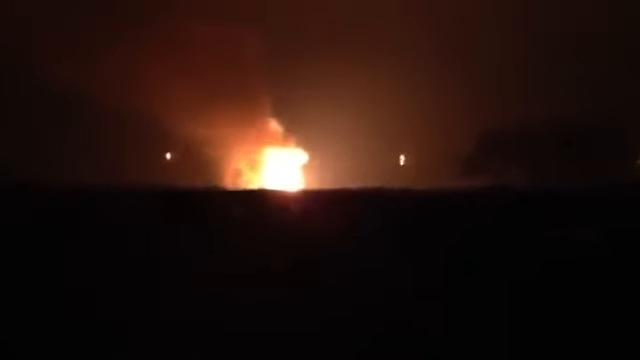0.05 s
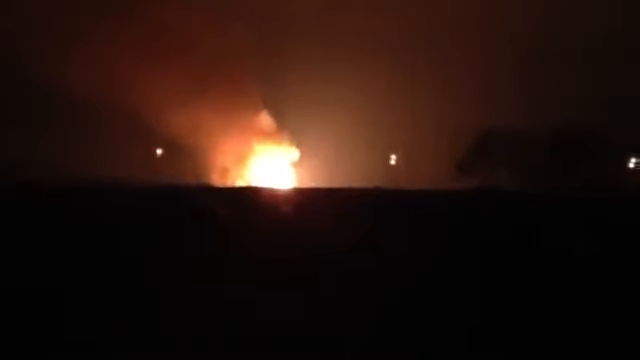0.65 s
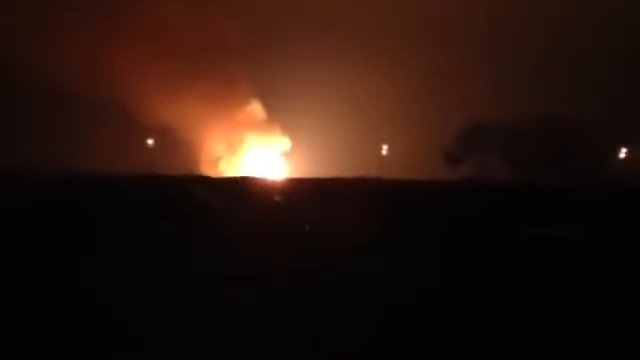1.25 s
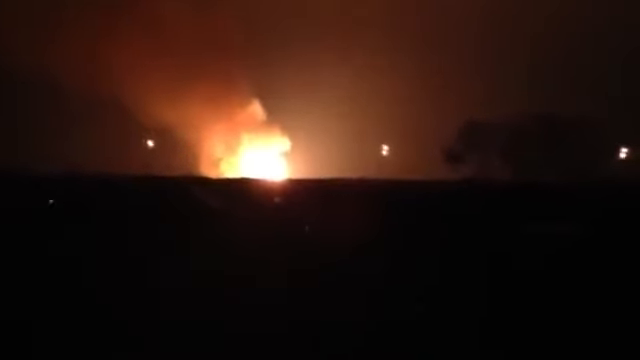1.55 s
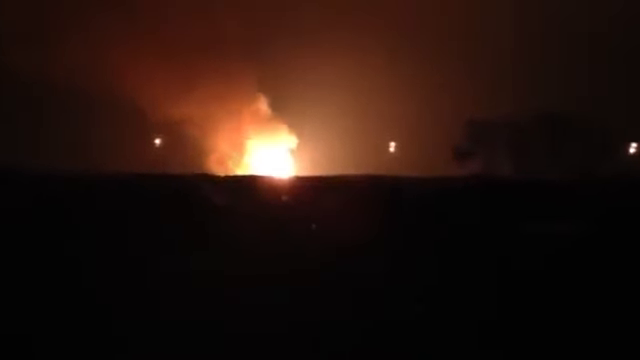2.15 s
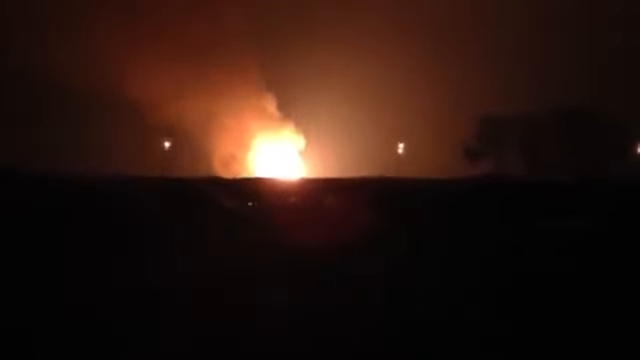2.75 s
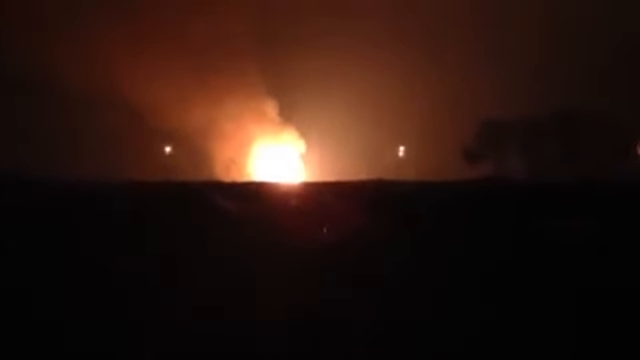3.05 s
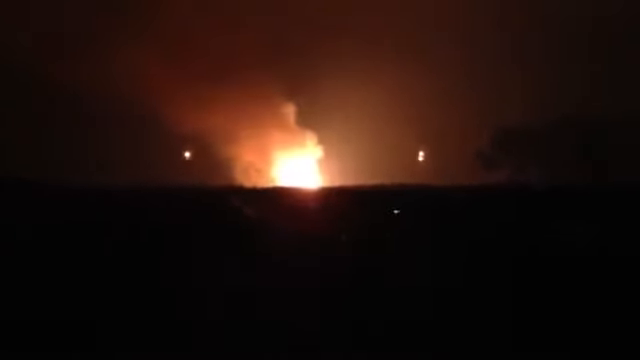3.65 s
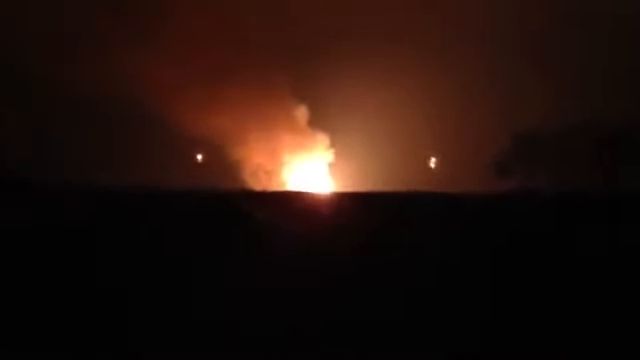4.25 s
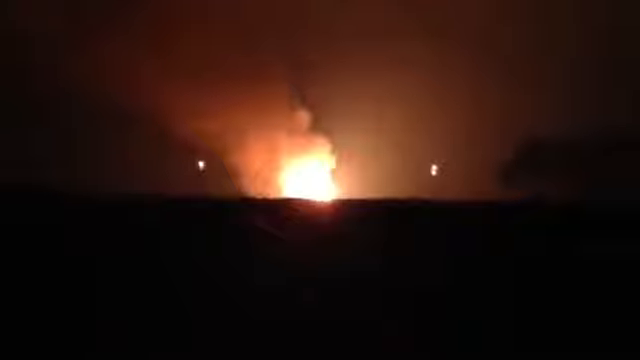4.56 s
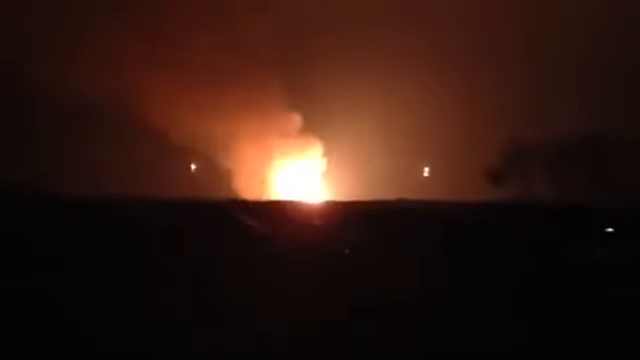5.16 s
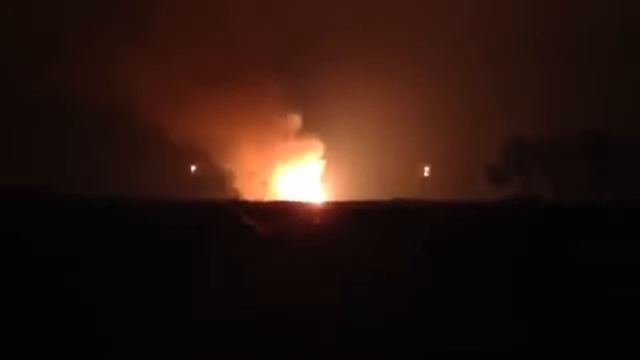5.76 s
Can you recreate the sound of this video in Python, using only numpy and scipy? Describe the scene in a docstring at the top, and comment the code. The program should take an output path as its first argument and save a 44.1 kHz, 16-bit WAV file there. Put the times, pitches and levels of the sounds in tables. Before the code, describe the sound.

A large gas fire roars far across a field at night, heard on a phone at an open window. The sound is deep, muffled and continuous, billowing as fireballs roll off the flame. A hollow blowing tone rides on it at the start and returns in a few surges past the middle. A faint hiss, soft dry ticks and slight hand rustles lie on top.

```python
"""Distant gas fire at night

A large gas fire roars far across a field, heard on a phone at an open window. The swirling flame makes
a deep, billowing noise with a few hollow surges. The air takes its treble and fades its pitch bands in
and out; the window recess colours it. A faint hiss, a hand's rustle and a few dry ticks lie on top."""
import sys
import numpy as np
from scipy import signal
from scipy.fft import rfft, irfft
from scipy.io import wavfile
from scipy.ndimage import uniform_filter1d, map_coordinates

SR = 44100
rng = np.random.default_rng(int(sys.argv[2]) if len(sys.argv) > 2 else 0)


def transcribe(u):
    """Save the signal u as a 16-bit wav file named by the first command-line argument.

    u: samples, shape (n,) or (channels, n), limited to [-1, 1]; the rate is SR.
    q: integer samples, one column per channel.
    """
    v = np.clip(np.atleast_2d(u).T, -1, 1)
    q = np.round(v * 32767).astype(np.int16)
    wavfile.write(sys.argv[1], SR, q)


N = 259749


def undb(db):
    """Turn decibels into a gain, the number to multiply a sound by."""
    return 10 ** (np.asarray(db) / 20)


def curve(points):
    """Join (time [s], value) points with straight lines, giving one value per sample."""
    times, values = np.transpose(points)
    return np.interp(np.arange(N) / SR, times, values)


def freqs():
    """The frequency of each slot of the spectrum, in Hz."""
    return np.maximum(np.arange(N // 2 + 1) * SR / N, 1)


def colour(points):
    """Join (frequency [Hz], level [dB]) points into a gain for each frequency."""
    hz, db = np.transpose(points)
    return undb(np.interp(np.log(freqs()), np.log(hz), db))


def peak(hz, width_hz):
    """The shape of a resonance: 1 at hz, falling away on both sides."""
    return 1 / (1 + (2 * (freqs() - hz) / width_hz) ** 2)


def bump(x, centre, half_width):
    """A smooth bell shape, 1 at its centre."""
    return np.exp(-((x - centre) / half_width) ** 2)


def noise(gain):
    """Noise shaped by a gain for each frequency, then brought to an average strength of 1."""
    x = irfft(rfft(rng.standard_normal(N)) * gain, N)
    return x / np.std(x)


def steady(x, span_s):
    """Even out a noise's level over spans longer than span_s; its quick flutter stays."""
    size = max(int(span_s * SR), 2)
    power = uniform_filter1d(uniform_filter1d(x ** 2, size), size)
    return x / np.sqrt(power)


def wobble(rate_hz):
    """A smooth random curve of typical size 1 that changes about rate_hz times a second."""
    return noise(1 / (1 + (freqs() / rate_hz) ** 4))


def background(level_db=-57):
    """A steady low murmur and the microphone's own thin noise."""
    # tone of the background: (frequency [Hz], relative level [dB])
    tone = [(15, -2), (30, -1), (55, 1.5), (90, 3), (400, -23.5), (3000, -36), (7500, -38), (9700, -48),
            (11500, -44), (14500, -40)]
    return noise(colour(tone)) * undb(level_db)


def hiss(flicker_db=1.0, flicker_hz=40, focus_steepness=2.5):
    """The little treble that arrives from so far: a faint, flickering hiss that sharpens as it swells."""
    # loudness of the broad hiss: (time [s], level [dB])
    levels = [(0, -65.5), (.4, -68), (.75, -64), (1.05, -61), (1.35, -62.5), (1.6, -59.7), (1.85, -58.3),
              (2.15, -60), (2.5, -62), (3.0, -63), (3.7, -61.5), (4.0, -60.5), (4.22, -57.5), (4.6, -59.5),
              (5.1, -61.3), (5.89, -60)]
    # tone of the broad hiss: (frequency [Hz], relative level [dB])
    tone = [(1200, -13), (2250, 8), (2600, 4), (3100, 1), (3900, -3), (4400, -3.5), (5200, -10.5),
            (7300, -13.5), (9500, -28.5), (14000, -22)]
    # the band where the hiss gathers: (centre [Hz], width [Hz], level at its loudest [dB])
    focus_band = (3900, 820, -65.5)
    hz, width, crest_db = focus_band
    hiss_db = curve(levels)
    focus_db = crest_db + focus_steepness * (hiss_db - hiss_db.max())
    broad = noise(colour(tone)) * undb(hiss_db)
    focus = noise(peak(hz, width)) * undb(focus_db)
    return (broad + focus) * undb(flicker_db * wobble(flicker_hz))


def rustles(grain_db=1.3, grain_hz=200, attack_s=0.0028):
    """Skin slips on the phone's case in short, slightly grainy strokes that trail away."""
    # slips of the hand: (start [s], fade time [s], level [dB])
    strokes = [(0.01, 0.069, -64.5), (0.128, .025, -68), (0.935, 0.047, -64), (4.882, 0.033, -54.5),
               (4.916, 0.037, -57), (4.944, .15, -65.5), (5.315, 0.039, -63), (5.669, 0.033, -61),
               (5.73, 0.04, -63.5), (5.86, 0.059, -57)]
    # tone of the rubbing: (frequency [Hz], relative level [dB])
    tone = [(1200, -9.5), (3500, 1.5), (5500, -4), (8300, -5.5), (10000, -14.5), (15000, -13)]
    t = np.arange(N) / SR
    pressure = 0
    for start, fade_s, db in strokes:
        age = np.maximum(t - start, 0)
        pressure += undb(db) * np.minimum(age / attack_s, 1) * np.exp(-age / fade_s)
    return pressure * noise(colour(tone)) * undb(grain_db * wobble(grain_hz))


def ticks():
    """Soft, dry ticks; the double one at 3.15 s is the phone crackling on a loud billow."""
    # ticks, the narrow ones slightly pitched:
    # (start [s], level [dB], fade time [s], centre [Hz], half-width [octaves])
    dry_ticks = [(2.259, -59, .012, 4320, .035), (2.281, -60, .013, 3440, .04),
                 (2.7601, -64, 0.0041, 3400, .4), (3.1511, -46, 0.0011, 3180, 0.46),
                 (3.1529, -54, 0.00092, 4570, .55), (4.879, -54, .003, 5030, .65),
                 (5.4835, -62, 0.006, 6500, .35)]
    t = np.arange(N) / SR
    out = 0
    for start, db, fade_s, hz, octaves in dry_ticks:
        band = 1 / (1 + (np.log2(freqs() / hz) / octaves) ** 2)
        fade = (t >= start) * np.exp(-np.maximum(t - start, 0) / fade_s)
        burst = rng.standard_normal(N) * fade
        tick = irfft(rfft(burst) * band, N)
        out += undb(db) * tick / np.sqrt(np.mean(band ** 2))  # make up for what the filter took
    return out


def window_recess():
    """Reflections in the window opening lift some pitches and cancel others; a gain for each frequency."""
    # peaks and dips of the recess: (centre [Hz], width [Hz], boost or cut [dB])
    resonances = [(135, 4.7, -3), (149.4, 19, 4), (206, 32, -3), (210, 4.1, 3), (288, 16, -3.5),
                  (302, 23, 2.5), (393.7, 23, -4.5), (404, 140, 1.5), (487, 17, -1.5), (535, 69, 4),
                  (640, 36, 3), (660, 20, -1), (813, 100, 3.5), (815, 33, -5.5), (882, 15, 3.5),
                  (1040, 19, -5.5), (1070, 58, 4.5), (1180, 47, 3), (1420, 40, 1), (1700, 120, 0.5)]
    return undb(sum(db * peak(hz, width) for hz, width, db in resonances))


def thin_bass(x, cutoff_hz=84):
    """The small microphone hardly takes in the deepest part of the roar."""
    return signal.sosfilt(signal.butter(6, cutoff_hz, "high", fs=SR, output="sos"), x)


def surges(attack_s=0.018, release_s=0.06, wander=0.01486, wander_hz=3, even_s=0.04):
    """Bursts of stronger gas flow blow a hollow note whose pitch wanders a little."""
    # bursts of the gas jet: (start [s], length [s], level [dB])
    bursts = [(0, 0.46, -28.5), (4.112, .43, -26), (4.642, 0.12, -23.5), (4.85, 0.45, -28)]
    # broad resonances of the note: (centre [Hz], width [Hz], relative level [dB])
    resonances = [(444, 64, -1), (547, 39, -3)]
    t = np.arange(N) / SR
    flow = 0
    for start, length, db in bursts:
        rise = np.clip((t - start) / attack_s, 0, 1)
        fall = np.exp(-np.maximum(t - start - length, 0) / release_s)
        flow = np.maximum(flow, undb(db) * rise * fall)
    note = noise(sum(undb(db) * peak(hz, width) for hz, width, db in resonances))
    speed = 1 + wander * wobble(wander_hz)  # playing faster or slower bends the pitch
    note = map_coordinates(note, [np.cumsum(speed)], mode="mirror")
    return flow * steady(note, even_s)


def lulls(hz, rumble_hz=160, reach_octaves=1.1):
    """The burning drops briefly between fireballs, most in the rumble; dB change for the band at hz."""
    # drops in the burning: (time [s], half-width [s], change in the rumble [dB])
    drops = [(.07, 0.13, -5.5), (.92, 0.028, -3), (1.78, 0.059, -1.5), (2.42, 0.043, -0.5),
             (4.05, 0.09, -4), (4.49, .04, -2.5), (5.06, 0.058, -4)]
    t = np.arange(N) / SR
    reach = bump(np.log2(hz / rumble_hz), 0, reach_octaves)
    return reach * sum(db * bump(t, at, half_width) for at, half_width, db in drops)


def billows(hz, half_width_s=0.046, reach_octaves=0.83, dip_gap_s=0.06, dip_share=0.32):
    """Fireballs roll off the flame: each swells between two dips; dB change for the band at hz."""
    # the strongest billows, each swelling around its own pitch: (time [s], swell size [dB], pitch [Hz])
    swells = [(.28, 3.5, 368), (.512, 4, 174), (0.799, 2.5, 131), (.92, 2.5, 507), (1.14, 2.5, 1100),
              (1.684, 5.5, 208), (1.956, 2, 141), (2.165, 3, 228), (2.256, 4, 137.4), (2.471, 2.5, 290),
              (2.606, 3.5, 131), (2.707, 4, 186), (3.155, 5.5, 180), (3.315, 4, 148), (3.616, 4.5, 140),
              (3.866, 4.5, 139), (3.915, 6, 219), (4.155, 5, 309), (4.255, 5.5, 220), (4.377, 5, 170),
              (4.585, 4.5, 240), (4.722, 5.5, 168), (4.79, 5, 135), (4.845, 5, 283), (5.214, 2, 161)]
    t = np.arange(N) / SR
    change_db = 0
    for at, db, pitch in swells:
        reach = bump(np.log2(hz / pitch), 0, reach_octaves)
        swell = bump(t, at, half_width_s)
        dips = bump(t, at - dip_gap_s, half_width_s) + bump(t, at + dip_gap_s, half_width_s)
        change_db += db * reach * (swell - dip_share * dips)
    return change_db


def flame(level_db=-19.0, flutter_db=0.57, flutter_hz=25, fade_hz=6, even_s=0.076):
    """Big swirls of burning gas rumble and billow, small ones rush more evenly; all flutter together."""
    # tone of the distant flame, shaping each band: (frequency [Hz], relative level [dB])
    tone = [(50, -30), (70, -30), (90, -17.5), (112, -6.5), (160, -0.5), (240, -1.5), (330, -4.5),
            (540, -13.5), (700, -19), (1100, -25), (1650, -34), (2050, -48), (3000, -82.5)]
    # strength of the burning, which builds slowly and sinks at the end: (time [s], relative level [dB])
    blaze = [(0, -20.5), (.5, -22), (1.4, -19.5), (2.3, -20), (2.75, -19), (3.1, -17), (3.5, -20),
             (4.05, -18), (4.8, -19), (5.05, -18), (5.3, -20), (5.89, -24.5)]
    # pitch bands, lowest first: (centre [Hz], relative level [dB], share of the blaze, random fade [dB])
    bands = [(142, -1.66, 1.1, 0.5), (211, -4.5, .35, 1.25), (315, -4.5, 0.15, 0), (520, -8, 0.16, 1.0),
             (1100, -14, 0.43, 0.5)]
    # borders between the bands: (frequency [Hz])
    borders = [190, 245, 400, 700]
    # slow drift of the 245-400 Hz band: (time [s], lift [dB])
    low_mid_drift = [(0, 2.4), (.7, 1), (1.1, 1.6), (1.6, 2.5), (2.45, 4), (2.72, -4), (3, 4), (3.45, 0),
                     (3.95, 1.5), (4.25, 1), (4.85, 3), (5.3, 0.5), (5.89, -2)]
    # slow drift of the 400-700 Hz band: (time [s], lift [dB])
    high_mid_drift = [(0, 1), (.3, 4), (.58, -1.6), (.9, 0.5), (1.6, 0.5), (2.1, -1.5), (3.15, 0.5),
                      (3.45, -3), (3.75, 1.7), (4.3, -1.3), (4.75, 2), (5.45, -2.2), (5.89, 1)]
    # slow drift of the band above 700 Hz: (time [s], lift [dB])
    upper_drift = [(0, 0.2), (.45, 0.3), (1.2, 0.1), (2.2, 0.4), (2.65, -1.5), (3.07, 0.9), (3.35, -1),
                   (5.89, 0.75)]
    spectrum = colour(tone) * window_recess()
    band_number = np.digitize(freqs(), borders)
    blaze_db = curve(blaze)
    drift_db = [0, 0, curve(low_mid_drift), curve(high_mid_drift), curve(upper_drift)]
    roar = 0
    for k, (hz, db, blaze_share, fade_db) in enumerate(bands):
        swirls = steady(noise(spectrum * (band_number == k)), even_s)
        burn_db = blaze_share * (blaze_db - blaze_db.mean()) + billows(hz) + lulls(hz)
        air_db = drift_db[k] + fade_db * wobble(fade_hz)  # hot, moving air fades each band on its own
        roar += swirls * undb(db + burn_db + air_db)
    return roar * undb(level_db + flutter_db * wobble(flutter_hz))


def scene():
    """The far fire with the rustles, ticks and background, in one channel."""
    fire = thin_bass(flame()) + surges() + hiss()
    return (fire + rustles() + ticks() + background())[None, :]


def record(dry, top_hz=15000, fade_s=0.003):
    """The phone cuts the highest treble; a tiny fade at each end avoids a click."""
    sample = np.arange(N)
    ramp = np.minimum(np.minimum(sample, sample[::-1]) / (fade_s * SR), 1)
    lowpass = signal.ellip(10, .1, 70, top_hz, fs=SR, output="sos")
    return signal.sosfilt(lowpass, dry * np.sin(np.pi / 2 * ramp) ** 2)


dry = scene()
out = record(dry)
transcribe(out)
```